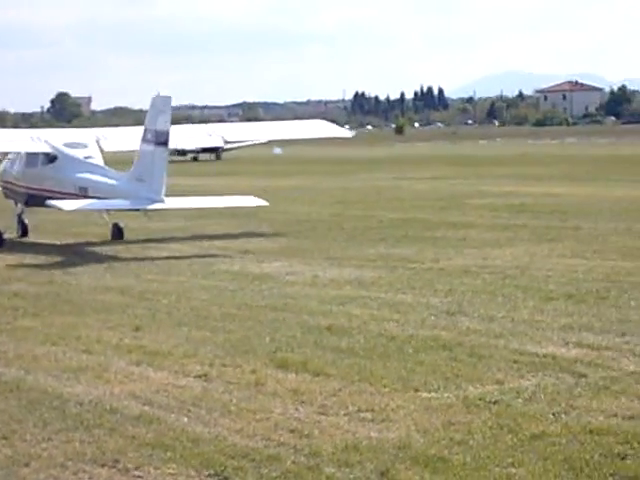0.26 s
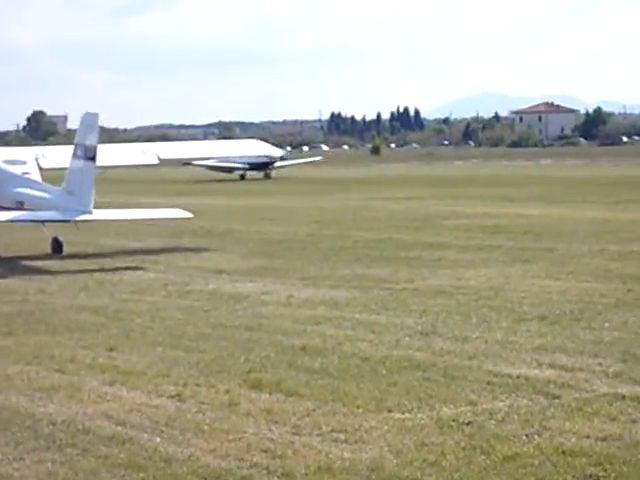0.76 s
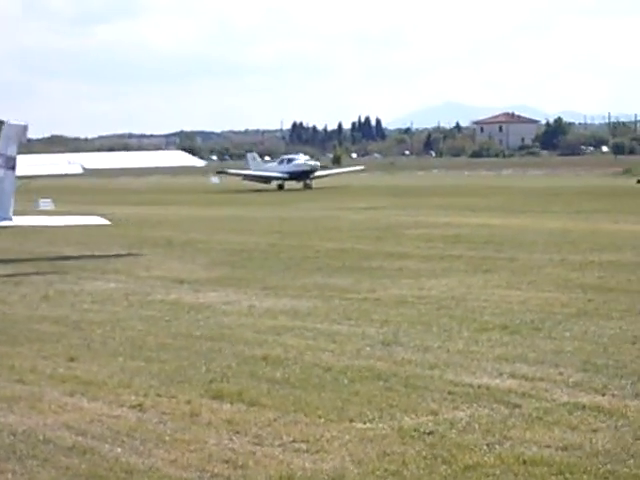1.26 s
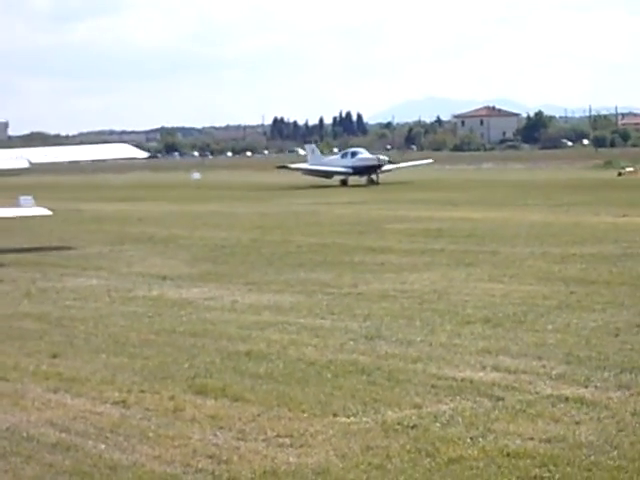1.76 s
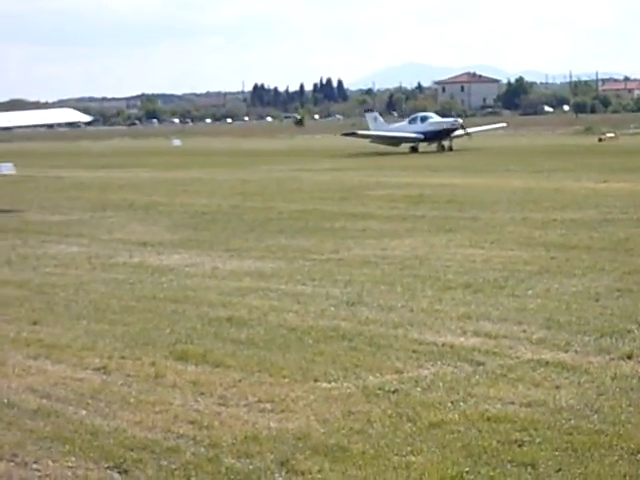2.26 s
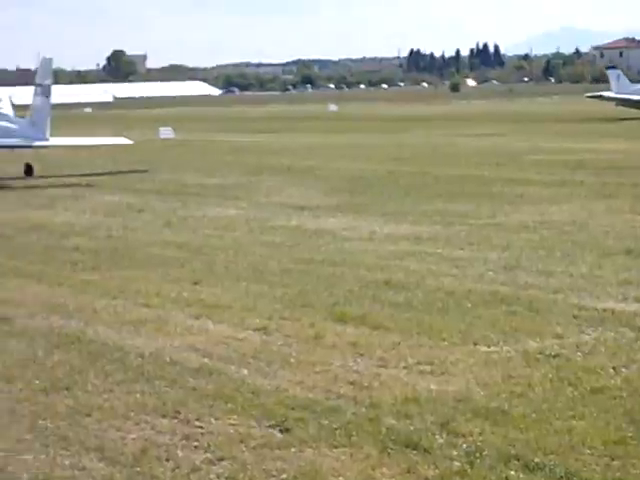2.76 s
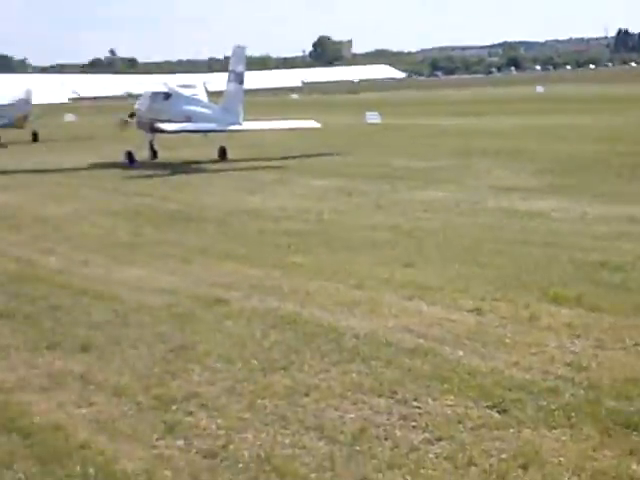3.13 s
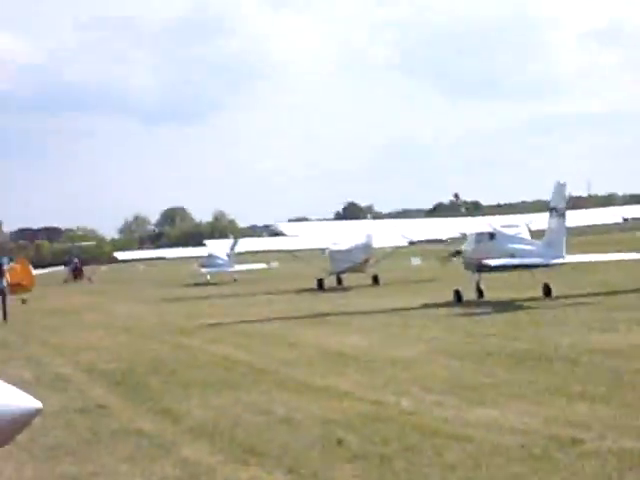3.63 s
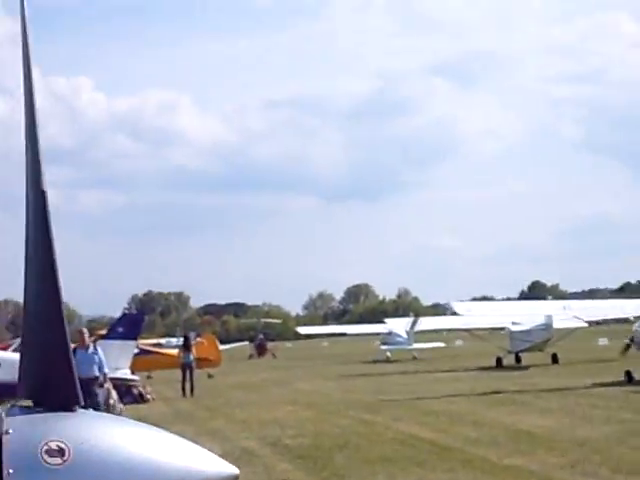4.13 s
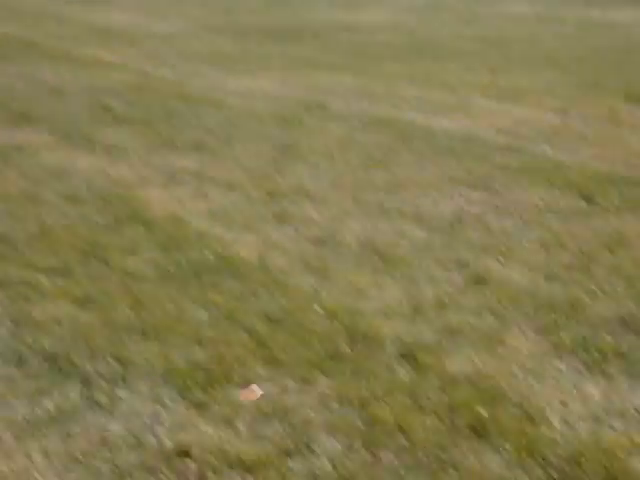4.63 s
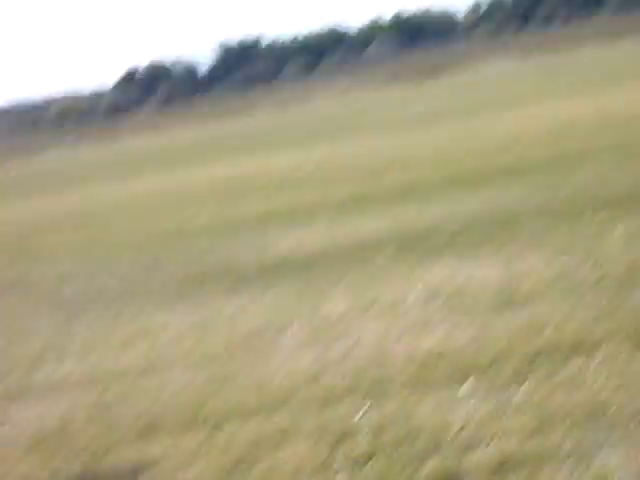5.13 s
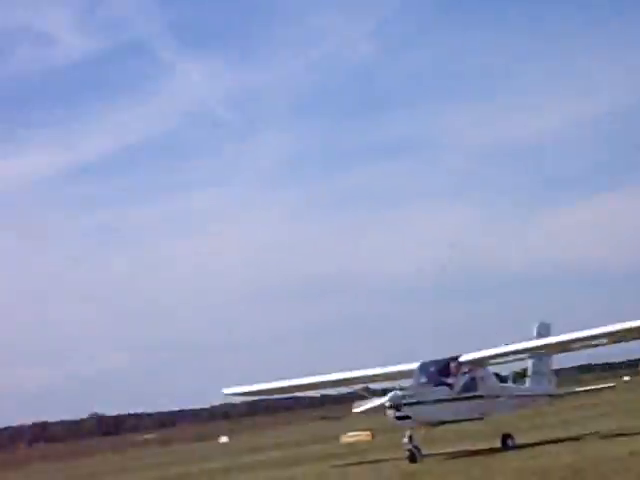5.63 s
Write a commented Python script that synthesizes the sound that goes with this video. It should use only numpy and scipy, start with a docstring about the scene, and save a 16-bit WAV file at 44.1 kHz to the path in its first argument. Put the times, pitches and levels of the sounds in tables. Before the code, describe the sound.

A steady low drone of light aircraft engines carries across an open field with no echo. Propeller wash pulses over it, along with valve rattle and a thin gear whine. A taxiing plane gradually recedes as the hand-held microphone swings toward others idling nearby. After a short dropout near the end, the engines come back with a brief hiss, and the microphone housing clicks once.

```python
"""Light aircraft on a grass airfield

Three four-cylinder planes are heard: one taxis, one idles, one warms up. Their exhaust notes beat
against each other; propeller wash and valve clatter pulse with the crankshafts, and a gearbox whines.
A hand-held microphone turns from plane to plane, cuts out for a moment and picks up two small clicks."""
import sys
import numpy as np
from scipy import signal
from scipy.fft import rfft, irfft
from scipy.io import wavfile

SR = 44100
rng = np.random.default_rng(int(sys.argv[2]) if len(sys.argv) > 2 else 0)


def to_wav(s):
    """Save 16-bit WAV."""
    ch = np.atleast_2d(s).T  # columns
    pcm = np.round(np.clip(ch, -1, 1) * 32767)  # PCM
    wavfile.write(sys.argv[1], SR, pcm.astype(np.int16))


N = 259749


def exhaust(turns, note, waver_db):
    """Fourier synthesis: firing harmonics form a pulse; unequal cylinders add lines between them."""
    loudest = max(db for order, db in note)
    out = np.zeros(N)
    for order, db in note:
        unsteady = waver_db * (1 + min(loudest - db, 10) / 5)  # weaker lines waver more
        offset = 2 * np.pi * rng.random() * (order % 4 > 0)  # firing harmonics stay aligned
        gain = from_db(db + unsteady * drift(5))
        out -= gain * np.sin(np.pi * order * turns + offset + unsteady / 6 * drift(5))
    return np.sqrt(2) * out


def exhaust_notes(taxi, idle, warm, warm_gain):
    """Beating: three engines at different speeds sound partials that lie close together."""
    # Exhaust lines. Each row: multiple of the four-stroke cycle rate (4 is the firing rate), level in dB.
    taxi_note = [(4, -43.5), (6, -57), (8, -42), (10, -61.5), (12, -55.5), (14, -58.5), (15, -62.5),
                 (16, -63.5), (20, -70.5), (22, -75.5)]
    idle_note = [(2, -58.5), (3, -74.5), (4, -47), (6, -61), (8, -52), (10, -58), (11, -63), (12, -62.5),
                 (13, -65.5), (14, -61), (16, -61.5)]
    warm_note = [(2, -65.5), (4, -60.5), (6, -53.5), (8, -55.5), (10, -62), (12, -53), (13, -54), (14, -59),
                 (16, -59), (18, -63.5)]
    loping = taxi + 0.016 * np.sin(np.pi * taxi)  # a weak cylinder: the crank lags every two turns
    notes = exhaust(loping, taxi_note, waver_db=1.01) + exhaust(idle, idle_note, waver_db=1.0)
    # low notes diffract round the microphone, so they depend far less on where it points
    return notes + warm_gain ** .5 * exhaust(warm, warm_note, waver_db=1.3)


def crankshaft(speed, wander):
    """Rotation is the integral of speed: turns made so far, at two slightly unsteady firings a turn."""
    firings, = in_time(speed)
    return np.cumsum(firings / 2 * (1 + wander * drift(8))) / SR


def propeller_wash(taxi, idle, warm, taxi_gain, idle_gain, warm_gain):
    """Turbulence radiates broadband noise, which pulses with each plane's crankshaft."""
    # Spectra of wash and engine clatter. Each row: frequency in Hz, relative density in dB.
    taxi_spectrum = [(210, -28), (350, -1.5), (458, -3), (540, -2), (924, 1), (1170, 0.5), (1510, -1),
                     (2510, -9), (3590, -13.5), (4700, -13.5), (5970, -23), (6720, -20.5), (9340, -19),
                     (10500, -27.5), (12400, -46.5), (16100, -90), (22000, -120)]
    idle_spectrum = [(330, -5), (450, -3.5), (685, 2), (1230, -5.5), (1720, -5.5), (2080, -12.5),
                     (2590, -5), (3190, -9.5), (4050, -11.5), (4490, -22), (5300, -16.5), (7000, -24),
                     (9060, -17), (10200, -23), (12000, -47)]
    warm_spectrum = [(300, 4), (420, -4.5), (700, -4.5), (1100, -1.5), (1680, -1), (2130, -5.5), (3240, -5),
                     (3760, -9), (4430, -13.5), (5460, -18.5), (7000, -20), (9600, -17.5), (10500, -24),
                     (12400, -46)]
    taxi_air = colour(chopped_air(taxi, per_turn=.2, per_firing=.036, flutter_db=.8), taxi_spectrum)
    idle_air = colour(chopped_air(idle, per_turn=.14, per_firing=.029, flutter_db=.5), idle_spectrum)
    warm_air = colour(chopped_air(warm, per_turn=.31, per_firing=.13, flutter_db=.3), warm_spectrum)
    warm_wash = from_db(-39.5) * warm_gain * ground_echo(warm_air, strength=0.083)
    return from_db(-43.5) * (taxi_gain * taxi_air + idle_gain * idle_air) + warm_wash


def chopped_air(turns, per_turn, per_firing, flutter_db):
    """Amplitude modulation: the power of turbulence swells with each crank turn and each firing."""
    with_turns = per_turn * puffs(turns, sharpness=3.5, uneven_db=1.2) ** 2
    with_firings = per_firing * puffs(2 * turns, sharpness=3, uneven_db=1.5) ** 2
    flutter = from_db(flutter_db * drift(16))
    return np.sqrt(1 + with_turns + with_firings) * flutter * rng.standard_normal(N)


def puffs(cycles, sharpness, uneven_db):
    """Exponential decay: one burst a cycle, each with a strength of its own; rms 1."""
    strength = from_db(uneven_db * rng.standard_normal(1024))
    return rms_one(strength[cycles.astype(int) % len(strength)] * np.exp(-sharpness * (cycles % 1)))


def rumble(turns, warm_gain):
    """Aperiodic flow has a continuous spectrum: the uneven part of the exhaust puffs is low noise."""
    # Each row: frequency in Hz, relative density in dB.
    spectrum = [(20, -21.5), (34, -18.5), (44, -4.5), (64, 0.5), (88, 12.5), (108, -2), (135, 6.5),
                (175, 6), (230, 6), (290, -5), (360, -2.5), (460, -21.5), (800, -30.5)]
    air = chopped_air(turns, per_turn=.1, per_firing=.45, flutter_db=.5)
    return (from_db(-45.5) + from_db(-52.0) * warm_gain) * colour(air, spectrum)


def valve_gear(turns):
    """Forced vibration: clatter once a turn rings the engine's casing; little of it reaches above 10 kHz."""
    # Strength of the clatter. Each row: time in seconds, gain in dB.
    strength = [(1.35, -19), (2.1, -2), (3.7, -0.2), (4.45, -2.5), (4.95, 2.5), (5.5, -7), (5.89, -1)]
    # Casing modes. Each row: frequency in Hz, width in Hz, level in dB at a clatter gain of 0 dB.
    modes = [(689, 210, -56), (1580, 250, -66), (2690, 520, -58.5), (4070, 120, -61), (5070, 430, -76),
             (8930, 330, -82)]
    clatter_db, = in_time(strength)
    clatter = chopped_air(turns, per_turn=4, per_firing=.3, flutter_db=.4)
    clatter = signal.sosfilt(signal.butter(8, 10000, fs=SR, output="sos"), clatter)
    casing = sum(from_db(db) * resonance(clatter, hz, width) for hz, width, db in modes)
    ring = resonance(resonance(clatter, hz=2540, width_hz=210), hz=2540, width_hz=210)
    ring_db = -56 + 3.7 * clatter_db  # the narrow ring grows faster than the clatter that drives it
    return from_db(clatter_db) * casing + from_db(ring_db) * ring


def growl(turns):
    """Resonance narrows pulsing noise to a rough midrange band that swells briefly."""
    # Each row: time in seconds, peak level in dB, half length in seconds.
    surges = [(1.41, -43.5, 0.057), (2.15, -48, 0.04), (2.41, -46, 0.063), (3.82, -52, .06),
              (4.94, -46.5, 0.04), (5.21, -45, .06)]
    air = chopped_air(turns, per_turn=2.2, per_firing=.2, flutter_db=.4)
    band = resonance(resonance(air, hz=794, width_hz=220), hz=794, width_hz=220)
    return swells(surges, steady_db=-57.5) * band


def gearbox(turns):
    """Meshing teeth sound a thin tone locked to the crankshaft; the firings modulate its load."""
    # Swells of the tooth tone and of the line one firing rate above it.
    # Each row: time in seconds, peak level in dB at unit load, half length in seconds.
    tooth_swells = [(2.7, -59, .4), (5.14, -47.5, 0.13), (5.44, -50, 0.19)]
    sideband_swells = [(2.05, -63, 0.11), (2.7, -58, .13), (3.8, -64.5, .4)]
    teeth_per_turn, jitter_hz = 105, 10
    phase = 2 * np.pi * (teeth_per_turn * turns + np.cumsum(jitter_hz * drift(120)) / SR)
    load = 1 + .2 * drift(80) + .3 * np.sin(2 * np.pi * turns) + .3 * np.sin(4 * np.pi * turns)
    tooth = swells(tooth_swells, steady_db=-66) * np.sin(phase)
    sideband = swells(sideband_swells, steady_db=-80) * np.sin(phase + 4 * np.pi * turns)
    return np.sqrt(2) * load * (tooth + sideband)


def spit_and_hiss(turns, presence):
    """Flow noise: a plane spits bright bursts once a turn, and air hisses as the microphone swings."""
    # Each row: time in seconds, peak level in dB (the spit's at full presence), half length in seconds.
    spit_bouts = [(.06, -57.5, 0.21), (.89, -57, .14)]
    swings = [(0, -56, 0.17), (5.28, -50, 0.13)]
    # Spectrum of both. Each row: frequency in Hz, relative density in dB.
    spectrum = [(2500, -9), (4000, 1), (5000, 4.5), (6000, -3.5), (7200, 1.5), (9300, 5.5), (10200, 2),
                (11200, -12), (12400, -23.5)]
    bursts = puffs(turns, sharpness=7, uneven_db=1) * rng.standard_normal(N)
    spit = presence * swells(spit_bouts, steady_db=-68.5) * colour(bursts, spectrum)
    hiss = swells(swings, steady_db=-65.5) * colour(rng.standard_normal(N), spectrum)
    return spit + hiss


def clicks():
    """Modal ringing: the microphone housing snaps with a brief bright ring, and lower modes follow."""
    # Each row: start in seconds, gain in dB, tilt in dB per octave about the first mode.
    snaps = [(4.4283, -34.5, -9.5), (5.8598, -1.5, 5.5)]
    # Each row: frequency in Hz, relative level in dB, onset delay in seconds, rise time in seconds.
    modes = [(9260, -1, 0.00013, 0.00039), (3640, -5, 0.000713, 0.00036), (3500, -17.5, .0012, 0.0012),
             (6370, -14, 0.00044, 0.00032), (7750, -20.5, 0.0012, 0.00055)]
    out = np.zeros(N)
    for start, db, tilt_db in snaps:
        for hz, mode_db, delay, rise in modes:
            age = np.maximum(np.arange(N) / SR - start - delay, 0)
            gain = from_db(db + mode_db + tilt_db * np.log2(hz / modes[0][0]))
            envelope = (age / rise * np.exp(1 - age / rise)) ** 2
            out += gain * envelope * np.sin(2 * np.pi * hz * age)
    return out


def ground_echo(x, strength):
    """Interference: the dulled bounce off the grass comes half a period late at the notch; rms 1."""
    # Tipping the microphone shortens the detour. Each row: time in seconds, lowest notch in Hz.
    notch = [(5.22, 409), (5.6, 613), (5.89, 840)]
    notch_hz, = in_time(notch)
    dull = signal.sosfiltfilt(signal.butter(1, 3000, fs=SR, output="sos"), x)
    echo = np.interp(np.arange(N) - SR / (2 * notch_hz), np.arange(N), dull)
    return rms_one(x + strength * echo)


def microphone_shadow(x, width_hz):
    """Acoustic shadow: the microphone's body weakens one treble band, which slides as it turns."""
    # Each row: time in seconds, band centre in Hz, share of the amplitude removed.
    shadow = [(1.2, 5950, 0.13), (2.6, 7200, 0.099), (4.5, 7270, .05), (4.9, 5050, .57), (5.25, 6250, .52),
              (5.55, 5800, 0.15)]
    hz, share = in_time(shadow)
    carrier = np.exp(2j * np.pi * np.cumsum(hz) / SR)
    band = signal.sosfiltfilt(signal.butter(1, width_hz / 2, fs=SR, output="sos"), x / carrier)
    return x - share * 2 * np.real(band * carrier)


def resonance(x, hz, width_hz):
    """A damped oscillator as a two-pole filter; rms 1."""
    r = np.exp(-np.pi * width_hz / SR)
    return rms_one(signal.lfilter([1, 0, -1], [1, -2 * r * np.cos(2 * np.pi * hz / SR), r * r], x))


def colour(x, spectrum):
    """Spectral shaping by rows of Hz and dB, falling away steeply beyond their ends; rms 1."""
    hz = np.maximum(np.arange(N // 2 + 1) * SR / N, 1)
    row_hz, db = np.transpose(spectrum)
    gain = from_db(np.interp(np.log(hz), np.log(row_hz), db))
    skirts = 1 / np.sqrt((1 + (.8 * row_hz[0] / hz) ** 8) * (1 + (.8 * hz / row_hz[-1]) ** 8))
    return rms_one(irfft(rfft(x) * gain * skirts, N))


def swells(rows, steady_db):
    """Addition in power: the gain of a steady sound with bell-shaped swells on top."""
    t = np.arange(N) / SR
    power = sum((from_db(db) * np.exp(-.5 * ((t - s) / half) ** 2)) ** 2 for s, db, half in rows)
    return np.sqrt(from_db(steady_db) ** 2 + power)


def drift(rate):
    """Low-passed noise that changes about rate times a second; rms 1."""
    hz = np.arange(N // 2 + 1) * SR / N
    return rms_one(irfft(rfft(rng.standard_normal(N)) / (1 + (hz / rate) ** 2) ** 2, N))


def in_time(rows):
    """Linear interpolation of each column of a curve, at every sample."""
    seconds, *columns = np.transpose(rows)
    return [np.interp(np.arange(N) / SR, seconds, column) for column in columns]


def from_db(db):
    """Decibels to amplitude ratio."""
    return 10 ** (np.asarray(db) / 20)


def rms_one(x):
    """Normalisation to unit rms."""
    return x / np.sqrt(np.mean(x ** 2) + 1e-20)


def scene():
    """Superposition in the open: the three planes add, with no walls to echo them."""
    # Engine speeds. Each row: time in seconds, firings per second.
    taxi_speed = [(0, 73.45), (.45, 74.2), (1, 73.2), (1.7, 76.35), (3, 76.5), (4.4, 76.85), (5.1, 77.45),
                  (5.35, 77.1), (5.89, 77.4)]  # throttled up a little as it rolls
    idle_speed = [(0, 82.85), (5.89, 83.1)]  # all but steady
    warm_speed = [(0, 93.1), (5.89, 96)]  # slowly gaining
    # How strongly each plane reaches the turning microphone. Each row: time in seconds, gain in dB.
    taxi_presence = [(0, 0), (1.6, 0), (4, -6.5), (5.1, -15)]
    idle_presence = [(0, -32), (.8, -6.5), (2.5, -0.44), (5.25, 0.5), (5.5, -25)]
    warm_presence = [(0, -8), (1.4, -25.5), (4, -25), (4.6, -5), (5.35, 1.5), (5.89, 0)]
    taxi = crankshaft(taxi_speed, wander=0.00119)
    idle = crankshaft(idle_speed, wander=0.0042)
    warm = crankshaft(warm_speed, wander=0.004)
    taxi_gain = from_db(in_time(taxi_presence)[0])
    idle_gain = from_db(in_time(idle_presence)[0])
    warm_gain = from_db(in_time(warm_presence)[0])
    planes = exhaust_notes(taxi, idle, warm, warm_gain) + rumble(taxi, warm_gain)
    planes += propeller_wash(taxi, idle, warm, taxi_gain, idle_gain, warm_gain)
    planes += growl(warm) + valve_gear(warm)
    planes += gearbox(taxi) + spit_and_hiss(taxi, taxi_gain)
    return (microphone_shadow(planes, width_hz=1100) + clicks())[None]


def record(dry):
    """Gating and band limiting: the sound cuts out for a moment; the deep bass and the top are cut."""
    off_s, on_s = 4.5172, 4.8863
    low_hz, high_hz = 25, 12300
    t = np.arange(N) / SR
    live = (t < off_s) | (t > on_s)
    thin = signal.sosfilt(signal.butter(2, low_hz, "high", fs=SR, output="sos"), dry)
    return signal.sosfilt(signal.ellip(10, .1, 90, high_hz, fs=SR, output="sos"), thin * live + 1e-18)


dry = scene()
out = record(dry)
to_wav(out)
```